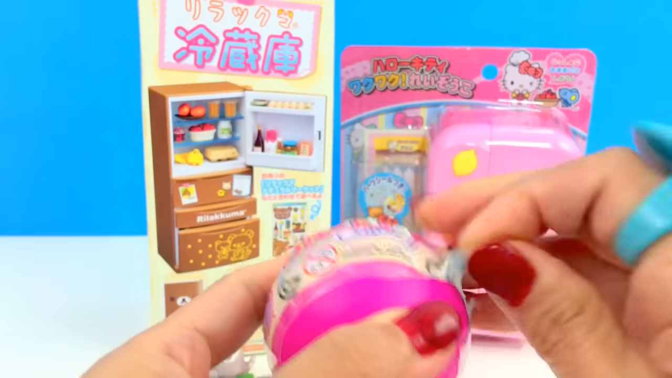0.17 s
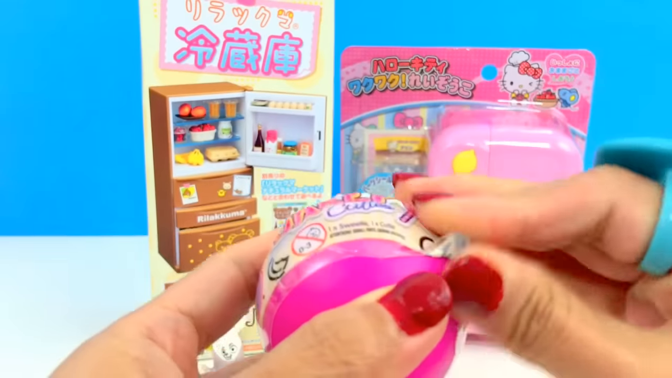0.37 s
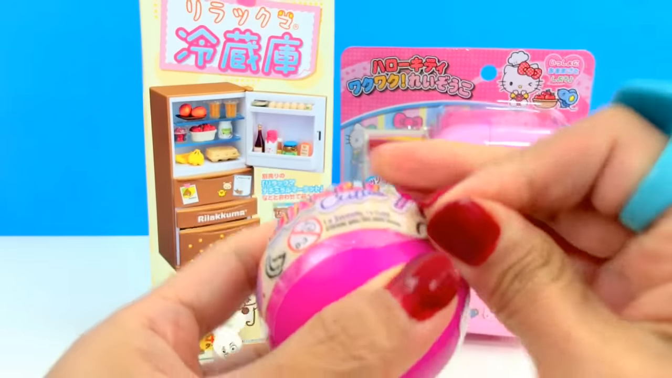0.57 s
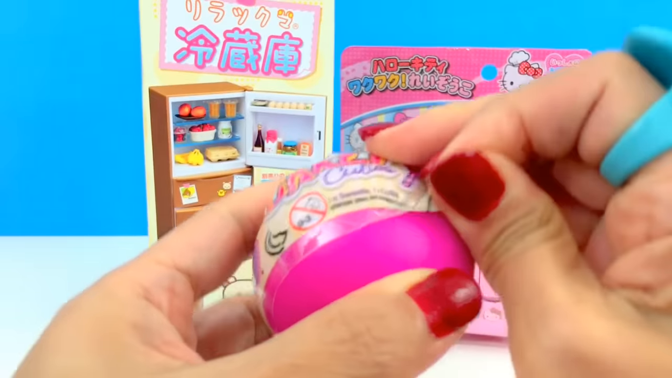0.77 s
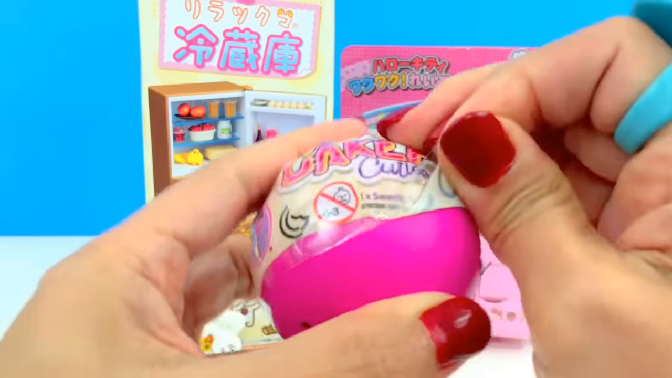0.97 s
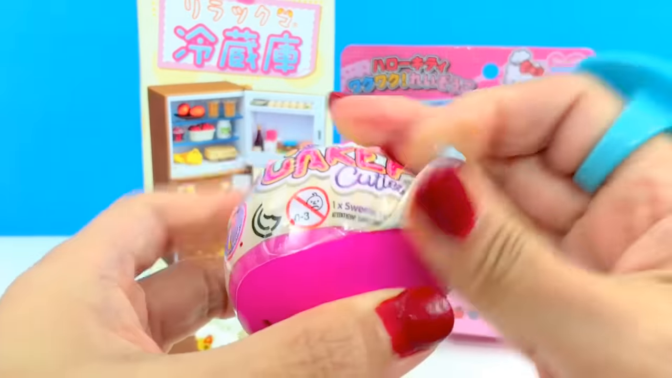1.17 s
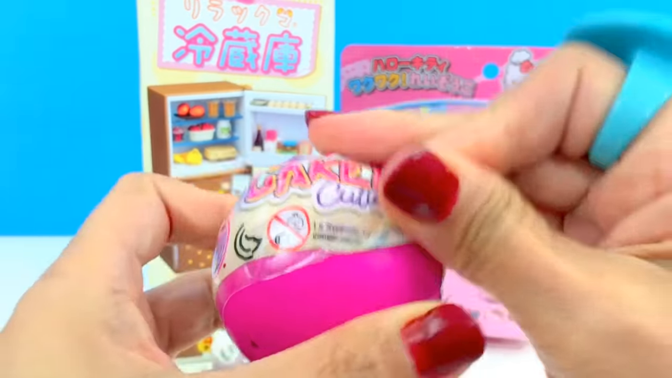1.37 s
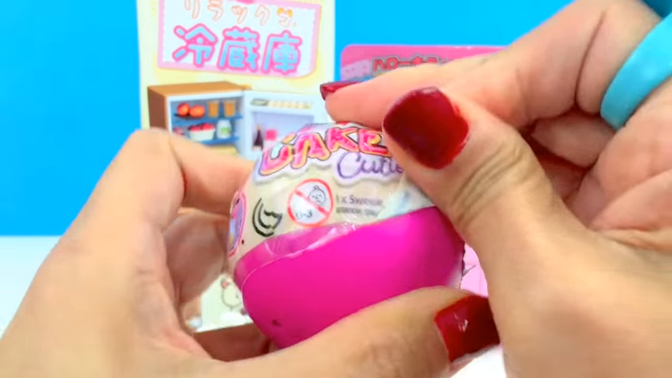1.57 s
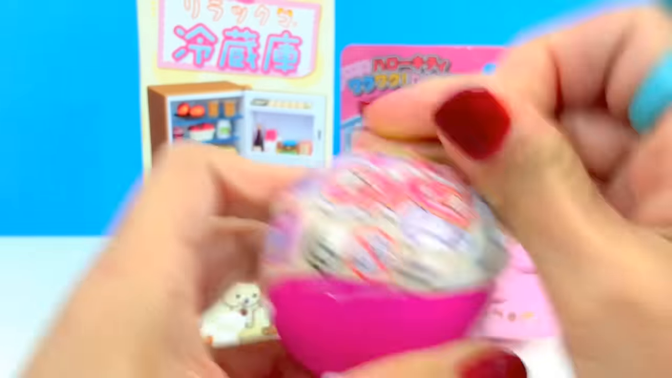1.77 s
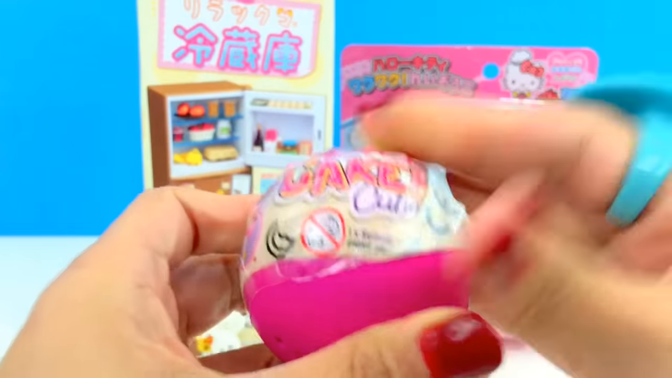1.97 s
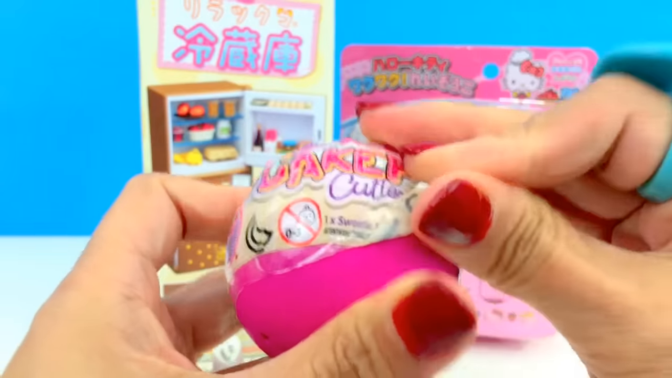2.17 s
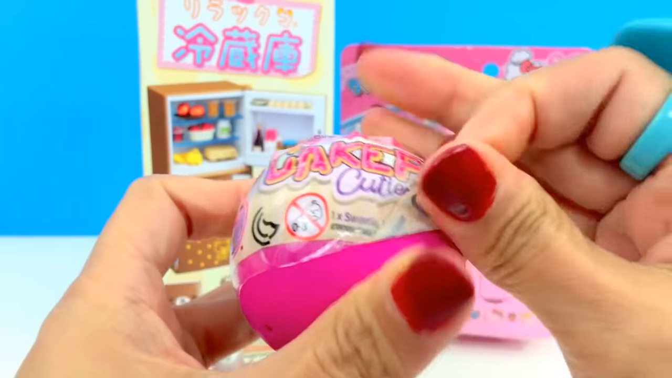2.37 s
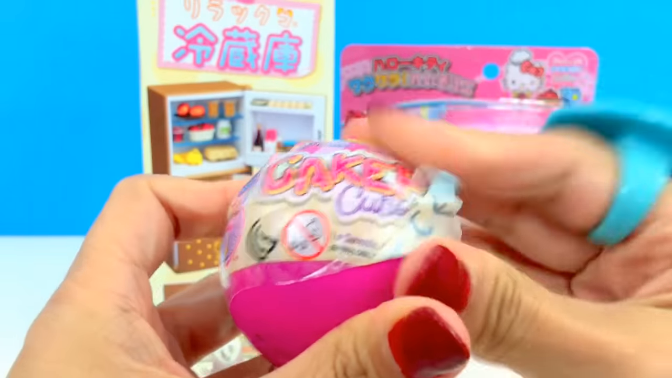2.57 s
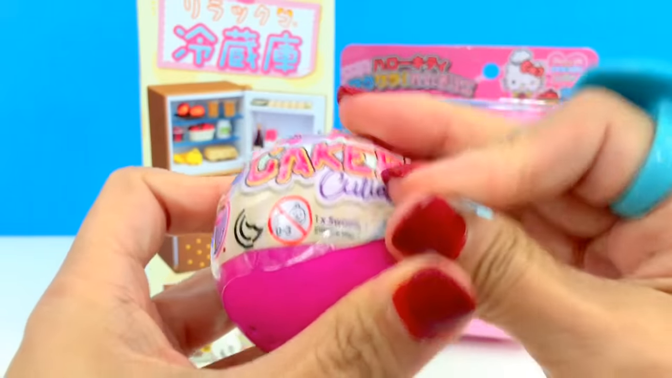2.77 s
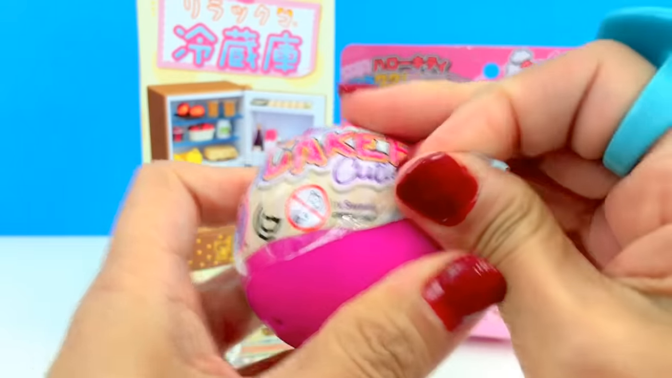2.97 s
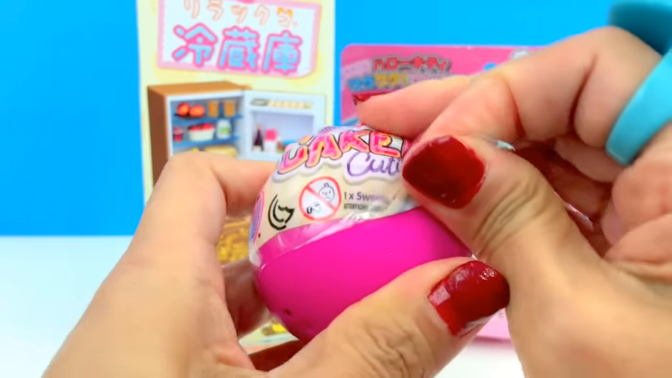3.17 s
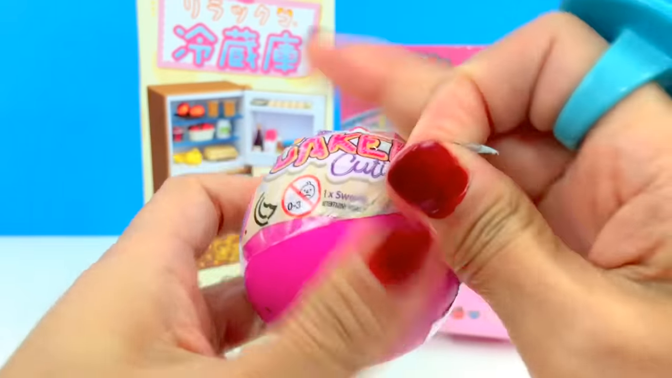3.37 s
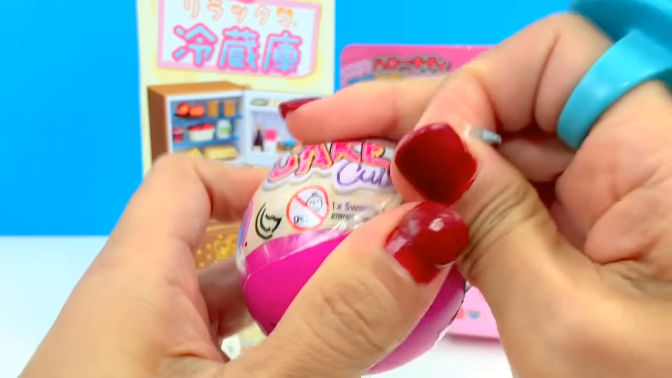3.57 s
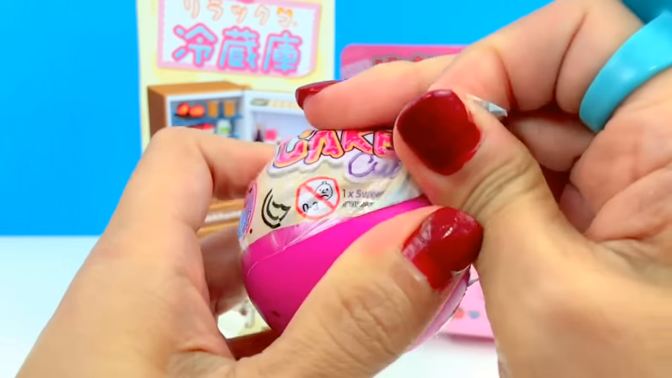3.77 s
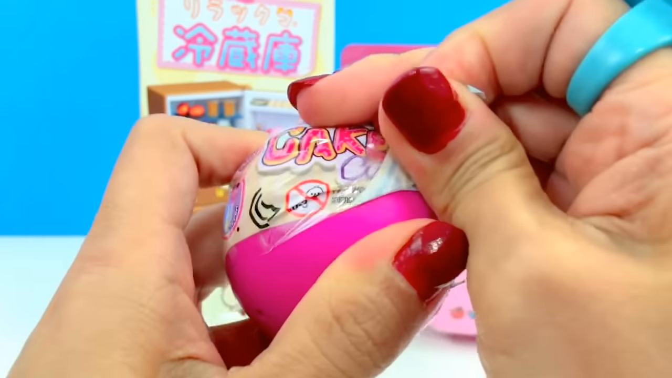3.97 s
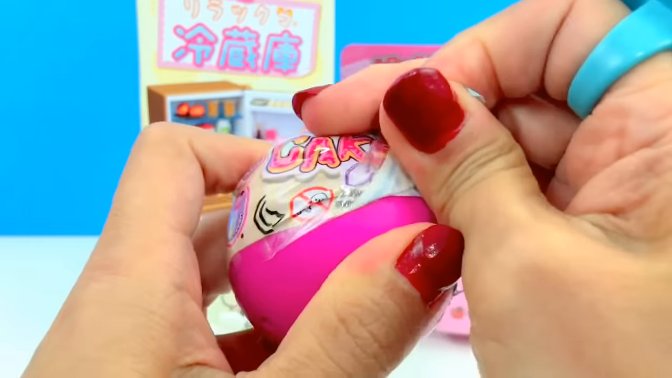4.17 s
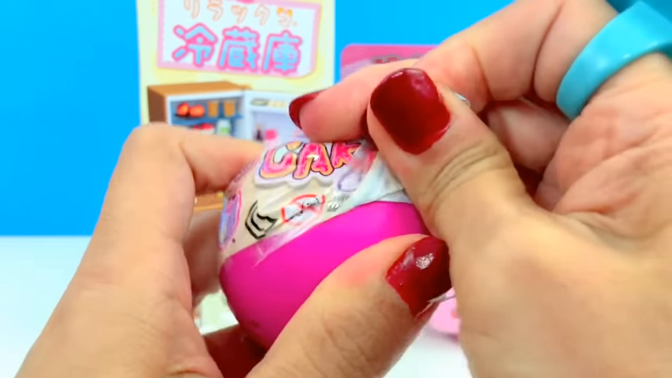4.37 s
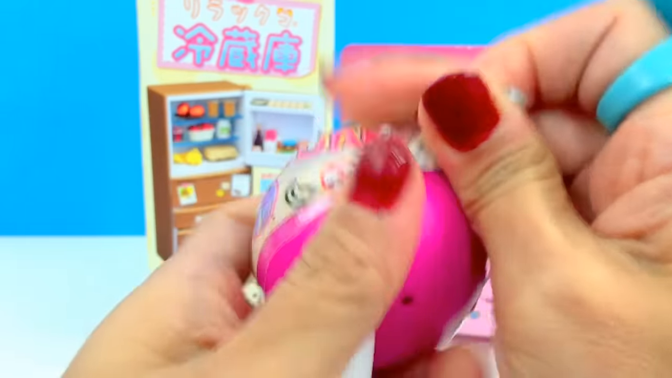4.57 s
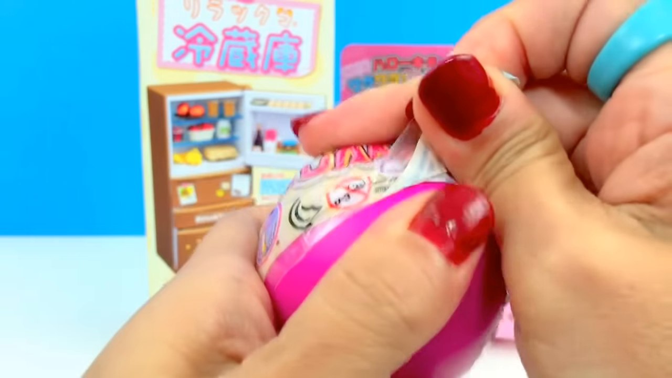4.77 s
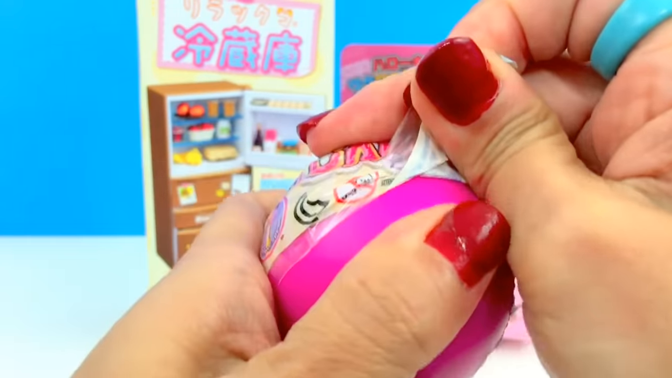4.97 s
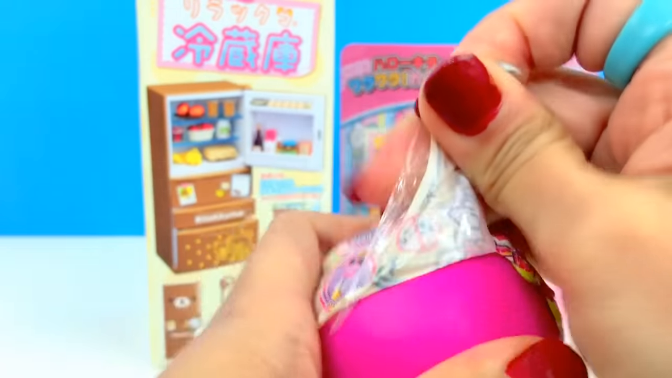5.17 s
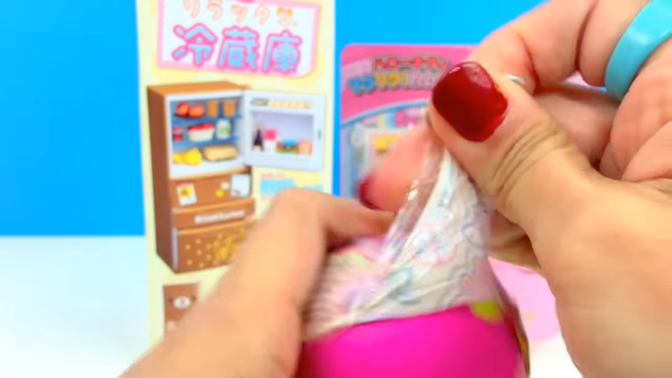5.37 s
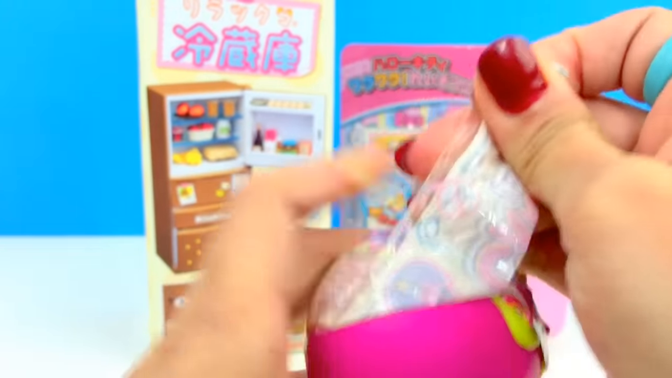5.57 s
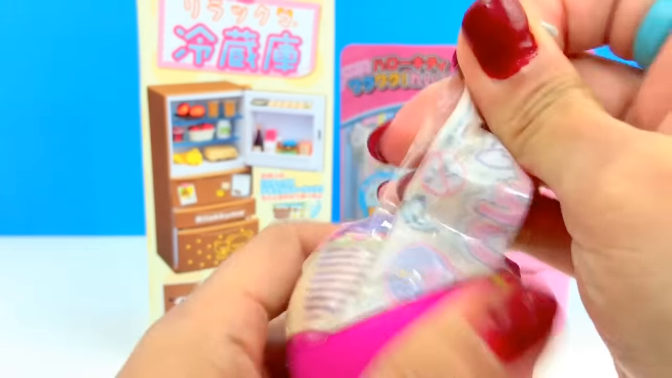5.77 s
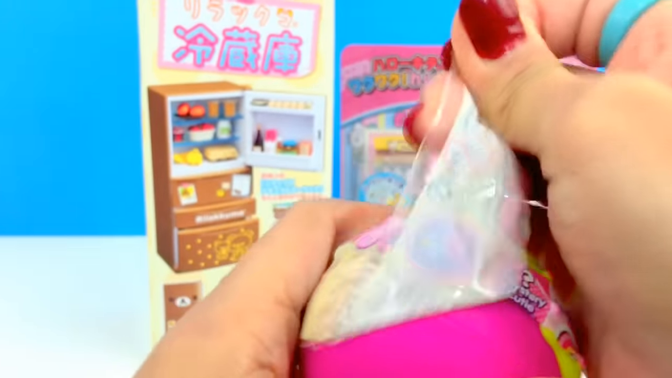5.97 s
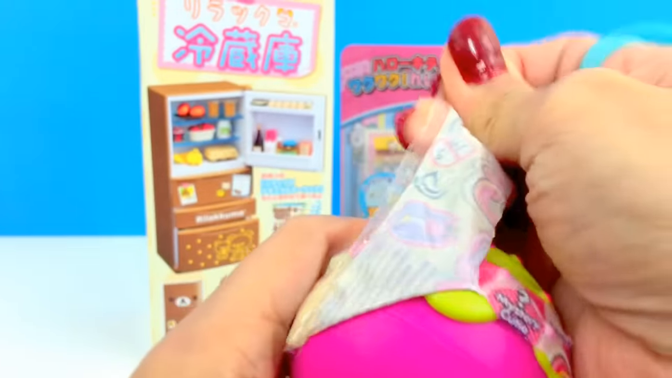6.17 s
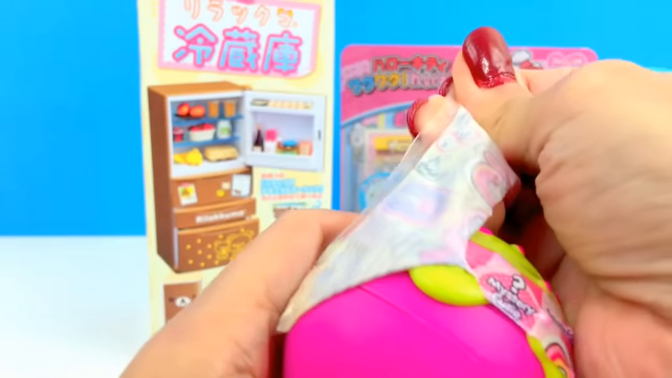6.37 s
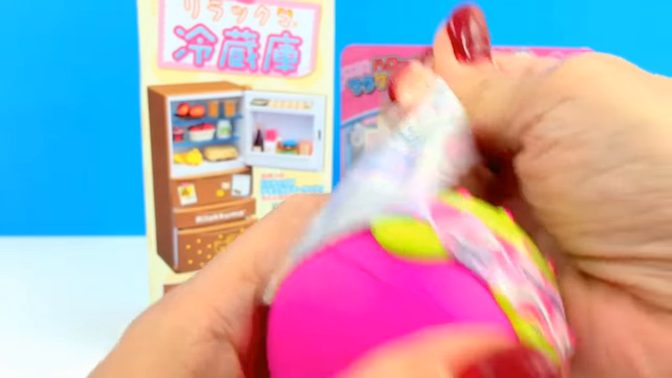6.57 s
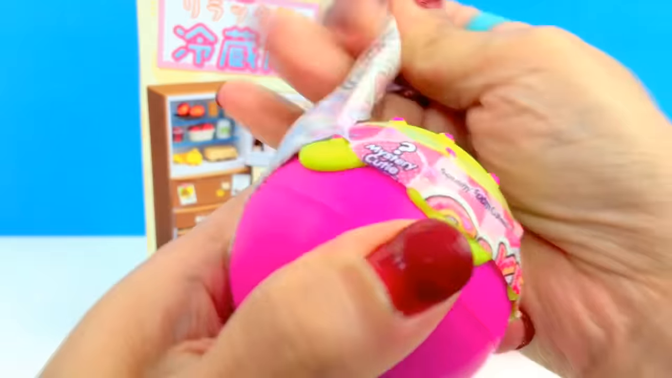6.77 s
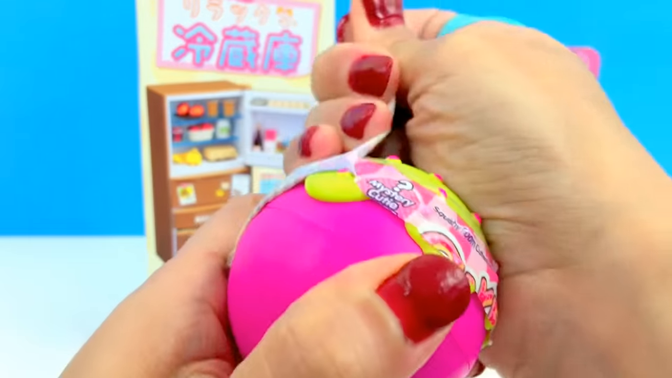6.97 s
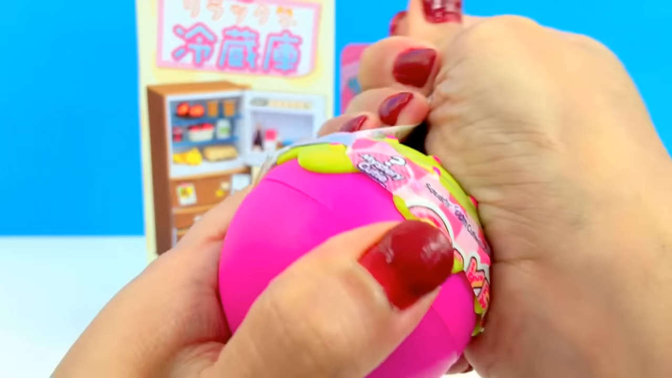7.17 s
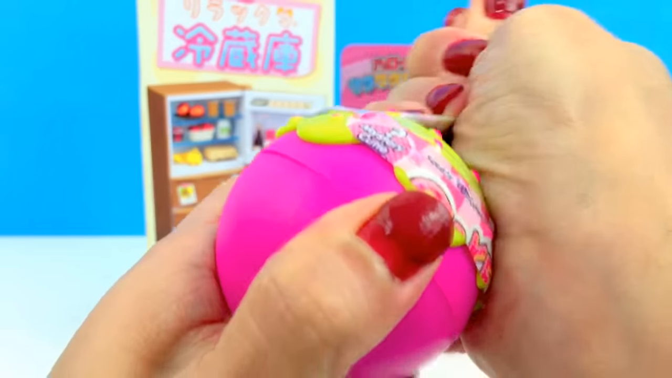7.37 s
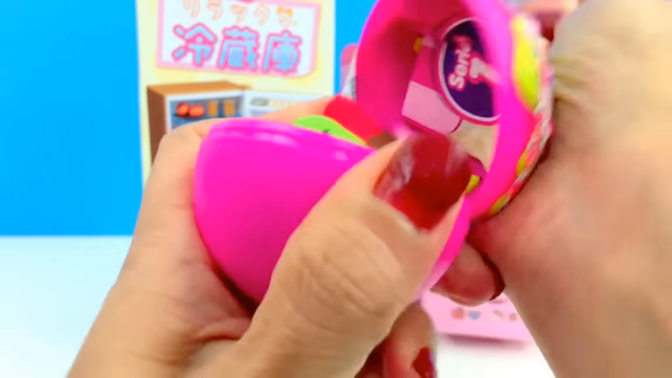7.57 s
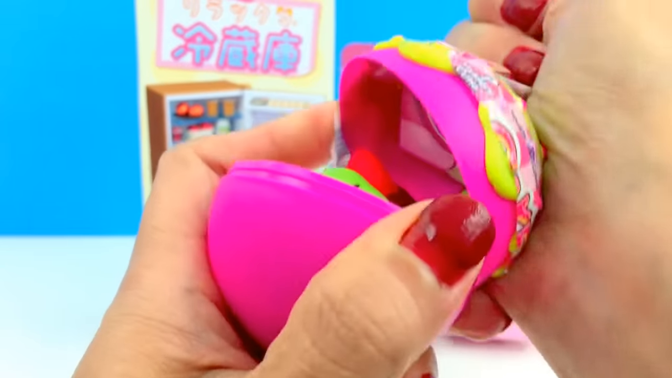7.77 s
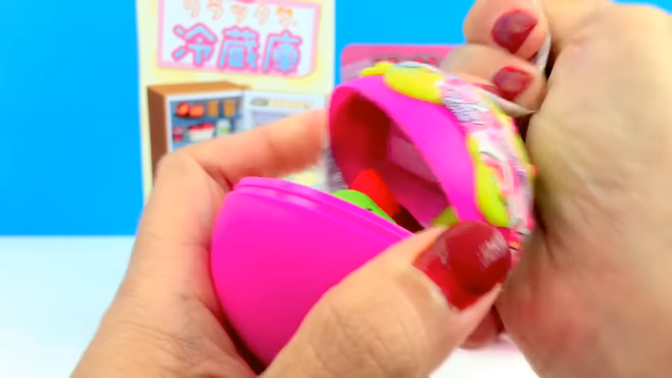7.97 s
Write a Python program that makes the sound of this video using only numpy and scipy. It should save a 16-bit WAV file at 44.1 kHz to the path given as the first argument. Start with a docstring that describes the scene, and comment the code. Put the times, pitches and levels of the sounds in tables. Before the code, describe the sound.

Sparse crinkles and isolated bright snaps of plastic wrap start quietly, with one taut crackling flurry early on. After a lull the film gives way in hard, dense crackles and short low puffs, then a perforated strip rips tab by tab. Brief creaks and hollow plastic knocks lead to the capsule popping open, then fade to small ticks. Close, dry, slightly overloaded, with a short small-room tail and faint hiss.

```python
"""Fingers peel thin plastic film off a hollow toy capsule close to a microphone in a small quiet room.
Creases snap as short bright noise bursts with body, fizz and a ring; a perforated seam rips tab by tab
in clicks with fast falling chirps; sudden releases give short low thumps, heard as falling chirps, that
overload the input. Slips creak in quick runs of knocks and ticks, filtered noise grains rustle under
finger strokes, and a diffuse room tail, hiss and a low hum lie below."""
import sys
import numpy as np
from scipy import signal
from scipy.fft import rfft, irfft, next_fast_len
from scipy.io import wavfile
from scipy.ndimage import uniform_filter1d

SR = 44100
rng = np.random.default_rng(int(sys.argv[2]) if len(sys.argv) > 2 else 0)


def log_audio(samples):
    """Write samples as a 16-bit WAV file to the path given in sys.argv[1]."""
    # one column per channel
    frames = np.atleast_2d(samples).T
    # limit to full scale, then quantise
    limited = np.clip(frames, -1, 1)
    pcm = np.round(limited * 32767).astype(np.int16)
    wavfile.write(sys.argv[1], SR, pcm)


N = 352932

# broad modes of the hollow capsule and film: (frequency [Hz], width [Hz], level [dB])
SHELL_MODES = [(1077, 45, -17.5), (2153, 380, -4), (3280, 500, -1), (4340, 480, -4.5), (6140, 2000, -2.5),
               (8720, 1500, -9.5)]


def undb(db):
    """Decibels to amplitude gain."""
    return 10 ** (np.asarray(db) / 20)


def unit(x):
    """Scale to rms 1."""
    return x / np.sqrt(np.mean(x ** 2))


def peak_one(rows):
    """Scale every row to peak 1."""
    return rows / (np.abs(rows).max(axis=1, keepdims=True) + 1e-12)


def band(x, lo_hz, hi_hz, order=2):
    """Butterworth band-pass along the last axis."""
    return signal.sosfilt(signal.butter(order, [lo_hz, hi_hz], "band", fs=SR, output="sos"), x)


def place(times, sounds):
    """Lay each row of sounds on the time line."""
    out = np.zeros(N + sounds.shape[1])
    for s, sound in zip(times, sounds):
        i = min(int(s * SR), N)
        out[i:i + len(sound)] += sound
    return out[:N]


def walk(rate):
    """Random levels held 1 / rate s, then smoothed twice over that span."""
    k = int(SR / rate)
    held = np.repeat(rng.standard_normal(N // k + 1), k)
    return uniform_filter1d(uniform_filter1d(held, k), k)[:N]


def air():
    """Room tone and hiss, drifting slightly in level, with a low hum wavering as narrow-band noise."""
    # noise spectrum, scaled as a whole afterwards: (frequency [Hz], relative density [dB])
    spectrum = [(20, -31), (60, 3), (110, -5.5), (320, -11), (600, -17), (2000, -18.5), (4400, -21.5),
                (5200, -27), (10000, -31.5), (16500, -36.5)]
    hz, db = np.transpose(spectrum)
    size = next_fast_len(N)
    f = np.maximum(np.arange(size // 2 + 1) * SR / size, 1)
    colour = undb(np.interp(np.log(f), np.log(hz), db))
    hiss = unit(irfft(rfft(rng.standard_normal(size)) * colour, size)[:N])
    hum = unit(band(rng.standard_normal(N), 58.7, 64))
    return undb(-55.5) * (undb(walk(3.1)) * hiss + undb(-12.5) * hum)


def room(x, room_db=-17.5):
    """Walls return a diffuse tail whose top treble dies first."""
    t = np.arange(SR // 2) / SR
    tail = 0
    # (low edge [Hz], high edge [Hz], T60 [s], level [dB])
    for lo_hz, hi_hz, t60, db in [(507, 2100, 0.182, 0.0), (2420, 11000, 0.268, -5.5), (8000, 21000, 0.042, 4.5)]:
        decay = np.exp(-np.log(1000) * t / t60)
        tail = tail + undb(db) * band(rng.standard_normal(len(t)), lo_hz, hi_hz) * decay
    tail = tail * np.clip(t / 0.00097, 0, 1)
    return undb(room_db) * signal.fftconvolve(x, tail / np.sqrt(np.sum(tail ** 2)))[:N]


def shell(x, direct_db=-8):
    """The hollow capsule and film ring at broad modes beside the direct sound."""
    out = undb(direct_db) * x
    for hz, width_hz, db in SHELL_MODES:
        out = out + undb(db) * signal.lfilter(*signal.iirpeak(hz, hz / width_hz, fs=SR), x)
    return out


def strokes(t):
    """Rustle level and treble tilt in dB at times t; overlapping strokes add in power."""
    # finger strokes: (time of peak [s], level [dB], rise [s], fall [s], treble tilt [dB])
    stroke_table = [(.258, -45.5, .05, .04, -11), (0.319, -50, .03, 0.12, 2),
                    (.485, -56.5, 0.08, 0.031, 10.5), (.9, -62, 0.5, 0.25, -24),
                    (1.23, -55.5, 0.17, 0.11, -1), (1.335, -47, 0.054, 0.051, -0.5),
                    (1.713, -40.5, .02, 0.073, 4), (1.81, -34.5, .05, .07, -2), (1.86, -37, .04, .045, 1.5),
                    (1.96, -53.5, .15, .3, -3), (2.13, -45.5, 0.04, 0.12, 3), (2.47, -53, 0.39, 0.24, -3.5),
                    (2.64, -50, 0.13, 0.37, -4.5), (3.129, -56.5, 0.67, 0.039, -8.5),
                    (3.391, -53.5, 0.038, 0.042, 4.5), (3.469, -53.5, 0.03, 0.03, 2),
                    (3.58, -56.5, 0.094, 1.78, -5), (4.58, -54.5, 0.3, 0.5, -0.5),
                    (5.13, -44.5, 0.054, .15, 1.5), (5.36, -50, 0.063, 0.41, -5),
                    (5.48, -42.5, .04, .1, -6), (5.95, -50, 0.39, 1.4, -1), (6.041, -32, .015, .03, -6),
                    (6.33, -40, .06, .2, 0), (6.7, -42.5, 0.03, 0.23, -4), (6.97, -41.5, .25, 0.29, -3),
                    (7.2, -43, 0.32, 0.15, -1), (7.396, -42.5, 0.033, .05, 13.5),
                    (7.52, -40, 0.08, 0.16, -8), (7.728, -46, .025, 0.05, -3), (8, -57, 1, .5, -9)]
    span_db = 20  # level change over one rise or fall time
    power, tilt = 1e-12, 0
    for s, db, rise, fall, tilt_db in stroke_table:
        distance = np.where(t < s, (s - t) / rise, (t - s) / fall)
        p = undb(db - span_db * distance) ** 2
        power, tilt = power + p, tilt + p * tilt_db
    return 10 * np.log10(power), tilt / power


def rustle(grains_per_s=500, scatter_db=3.5):
    """Countless tiny creases, a few louder than the rest, sound through the shell under finger strokes."""
    t = np.arange(N) / SR
    db, tilt_db = strokes(t)
    hits = (rng.random(N) < grains_per_s / SR) * undb(scatter_db * rng.exponential(size=N))
    # each crease lets out noise that dies in a few milliseconds, over a steady noise bed
    envelope = signal.lfilter([1], [1, -np.exp(-1 / (0.0027 * SR))], hits) + .4
    grains = shell(envelope * rng.standard_normal(N))
    dull = unit(band(grains, 2410, 9800))
    bright = unit(band(grains, 7350, 17700))
    hollow = unit(band(grains, 1420, 2100))
    taut = unit(band(grains, 3170, 3450))
    # as the film comes off, the bare shell sounds through more
    hollow_db = np.interp(t, [5, 7.5], [-9, -4])
    # the film rings while it is pulled tight
    taut_db = np.interp(t, [1.6, 1.82, 2.1], [-24, -5, -24])
    mix = dull + undb(tilt_db) * bright + undb(hollow_db) * hollow + undb(taut_db) * taut
    return undb(db + 3.3 * walk(30)) * mix


def snaps(count, t60_ms, spread=.3):
    """Noise bursts of a sharp spike and a ragged decay, each with its own length around t60_ms."""
    t = np.arange(900) / SR
    draw = rng.standard_normal((count, len(t) + 1))
    t60 = t60_ms / 1000 * np.exp(spread * draw[:, :1])
    spike = 1 + 1.5 * np.exp(-t / .0003)
    attack = np.minimum(t / .0001, 1)
    return draw[:, 1:] * spike * np.exp(-np.log(1000) * t / t60) * attack


def creaks():
    """Film and shell creak in quick runs of slips: dull knocks with ticks, the middle run a zip of bright ticks."""
    # (start [s], end [s], slip rate [1/s], level [dB], bright tick re knock [dB])
    creak_table = [(6.983, 7.037, 170, -38, 4), (7.06, 7.165, 170, -53, 26), (7.882, 7.99, 70.5, -40, 1)]
    out = 0
    for start, end, rate, db, tick_db in creak_table:
        s = start + np.arange(round((end - start) * rate)) / rate
        draw = rng.standard_normal((len(s), 2))
        knock = peak_one(band(snaps(len(s), 16), 1438, 2100))
        tick = peak_one(band(shell(snaps(len(s), 3.1)), 2440, 16000))
        slip_db = db + 2 * draw[:, 1:]
        out = out + place(s + 0.00048 * draw[:, 0], undb(slip_db) * (knock + undb(tick_db) * tick))
    return out


def thump(length_ms, growth=1.95, first_ms=1.2):
    """A low thump as a falling chirp: each half swing lasts longer by a constant factor."""
    ms = (1 + np.arange(4000)) * 1000 / SR
    u = ms / np.reshape(length_ms, (-1, 1))
    swell = 2 * u / (1 + u ** 2.6) * np.exp(-(ms / 40) ** 2)
    return swell * np.sin(np.pi * np.log(ms / first_ms) / np.log(growth))


def puffs():
    """Sudden releases of the film and the shell popping open puff air on the microphone as low thumps."""
    # (time [s], level [dB], length [ms], direction [push 1 or pull -1])
    puff_table = [(5.1367, 0.5, 4.8, 1), (5.4845, -11, 2.4, -1), (6.4786, -9, 3, -1), (7.3974, 4, 6.2, -1),
                  (1.7135, -30, 7, -1), (6.9734, -24, 2.7, -1), (7.3885, -12, 6, -1), (7.374, -28, 6, 1),
                  (5.124, -18, 4, 1), (3.755, -28, 3, -1)]
    s, db, length_ms, way = np.transpose(puff_table)
    thumps = place(s, (np.sign(way) * undb(db))[:, None] * thump(length_ms))
    # the microphone's vent lets the slowest pressure leak away
    return signal.sosfilt(signal.butter(2, 30., "high", fs=SR, output="sos"), thumps)


def seam():
    """Every tab breaks with one sharp click that trails off in a fast falling chirp, and the film rattles."""
    # course of the rip along the perforated seam: (time [s], tab level [dB])
    rip = [(6.2964, -12), (6.3124, -10.5), (6.3569, -24), (6.409, -18), (6.4255, -12.5), (6.4312, -10),
           (6.46, -6), (6.495, -8), (6.5779, -3.5)]
    # tabs torn by each of those times: (count)
    torn = [0, 2, 8, 15, 18, 19, 22, 23, 24]
    jitter_s, scatter_db = .0004, 1
    when, tab_db = np.transpose(rip)
    tab = np.arange(torn[-1] + 1)
    draw = rng.standard_normal((len(tab), 2))
    s = np.interp(tab, torn, when) + jitter_s * draw[:, 0]
    db = np.interp(tab, torn, tab_db) + scatter_db * draw[:, 1]
    ms = (1 + np.arange(900)) * 1000 / SR
    chirp = np.sin(np.pi * np.log(ms / 0.057) / np.log(2.4))
    click = chirp * (ms / 0.11) ** -.75 * np.exp(-ms / 5)
    # the tabs are alike, so their bright fronts nearly repeat
    fronts = snaps(1, 2.6, spread=0) + .5 * snaps(len(s), 4.2)
    fizz = peak_one(band(fronts, 11400, 17000))
    rattle = peak_one(band(shell(snaps(len(s), 9, spread=0.21)), 3800, 8000, order=1))
    # the loose flap grows along the seam: less tight film to fizz
    fizz_db = np.interp(s, [6.3, 6.42, 6.46], [-1.5, -3, -10])[:, None]
    tabs = undb(fizz_db) * (fizz + undb(-4.0) * rattle) - undb(-1.5) * click
    return place(s, undb(db)[:, None] * tabs)


def ticks():
    """Small random creases as crack rows, denser and stronger in busy strokes, each ringing near a shell mode."""
    count, crowding = 900, .45  # crowding: share of the stroke level in dB that sets the density
    over_rustle_db, scatter_db, colour_db = 2, 2.5, 7
    chance, colour = rng.random((count, 3)), rng.standard_normal((count, 3))
    t = np.arange(0, N / SR, 1 / 1000)
    busy = np.cumsum(undb(crowding * strokes(t)[0]))
    s = np.interp(chance[:, 0], busy / busy[-1], t)
    db, tilt_db = strokes(s)
    db = db + over_rustle_db - scatter_db * np.log(1 - chance[:, 1])
    body_db = -6.5 + colour_db * colour[:, 0]
    fizz_db = tilt_db + 4 + colour_db * colour[:, 1]
    # any mode but the lowest and the highest
    mode = 1 + (chance[:, 2] * (len(SHELL_MODES) - 2)).astype(int)
    ring_hz = np.array(SHELL_MODES)[mode, 0] * (1 + 0.076 * colour[:, 2])
    return np.column_stack([s, db, body_db, fizz_db, ring_hz])


def cracks(ring_db=-3, ring_q=12.0):
    """Each crack has body, middle and fizz, and the buckling patch of film rings briefly at its own pitch."""
    # louder creases and shell snaps, body and fizz relative to the crack's level:
    # (time [s], level [dB], body [dB], fizz [dB], ring [Hz])
    crack_table = [(0.127, -30.5, -6, 9, 4700), (0.209, -31.5, -30, -1, 4620), (0.2554, -24, -16, -7, 3210),
                   (0.263, -22.5, -10, -8, 1980), (0.3096, -24.5, -12, -15, 5920),
                   (0.3193, -28, -8.5, -8, 1615), (0.665, -40.5, 4, -10, 695),
                   (0.8727, -19.5, -21, 1, 6900), (0.9027, -18.5, -14, -5, 3180),
                   (0.92, -23, -4.5, -10, 3500), (0.9702, -24.5, -9.5, -3, 5500),
                   (1.0921, -20.5, -36.5, 0, 4340), (1.2614, -23, -6, -24, 3780),
                   (1.6428, -16.5, -13, 4.5, 6250), (1.7143, -0.5, -9, -2, 6450),
                   (1.777, -32, 8, -10, 1430), (1.7903, -20.5, 0, -1, 3300), (1.7995, -28, 3, -9.5, 3235),
                   (1.8077, -19, -1.5, -12, 3300), (1.8164, -18, -19, -1, 3030),
                   (1.8466, -11.5, -24, -6, 4500), (1.8573, -17, -30, -17, 3440),
                   (1.9412, -26, 5.5, -8, 1410), (1.994, -33, 0, 8.5, 7600), (2.131, -25, -22, 15.5, 7080),
                   (2.108, -38, -8, 14.5, 4460), (2.145, -6, -14, 1.5, 7050), (2.157, -27.5, 2, 0, 2200),
                   (2.393, -26, -15.5, 2, 5800), (2.4332, -19.5, -36.5, -6, 4500),
                   (2.4687, -24.5, -19, 7.5, 3170), (2.49, -29, -13, -1, 3200),
                   (2.7044, -11, -9.5, 10.5, 6250), (3.5795, -28.5, -26, 3, 6000),
                   (3.656, -21, -8, 8.5, 5900), (3.7113, -34, -27, 19.5, 6070),
                   (3.7555, -8, -12.5, 13, 3800), (3.769, -18.5, -30, 13, 7400),
                   (3.8633, -24.5, -13, 10.5, 7630), (4.318, -35.5, 2, -2, 725),
                   (4.393, -29, -10, 7.5, 3370), (4.474, -34, 9, -35, 2200),
                   (4.494, -26.5, -6.5, -20, 3200), (4.5362, -30, -11, -6, 6270),
                   (4.5822, -15.5, -24, -2, 3623), (4.7709, -35.5, 13.5, -3, 727),
                   (4.8818, -20, -17.5, -0.5, 4570), (5.1248, -24, 4, -0.5, 6160),
                   (5.1303, -6.5, -14, -9, 6600), (5.135, -4, 3.5, 8.5, 6170), (5.1514, -12, -4, -3, 3960),
                   (5.161, -7.5, -16, -10, 6600), (5.184, -15, -29, -11, 5240), (5.2, -11.5, -17, 4, 6260),
                   (5.3314, -14, -29, -26, 4060), (5.3977, -30.5, -4, 3, 5730),
                   (5.4647, -17.5, -4.5, -7, 3290), (5.4781, -3, -9.5, -21, 5500), (5.4851, 4, -3, 5, 5550),
                   (5.4933, -18, 7.5, 21, 5740), (5.499, 2.5, -7, 1.5, 6400),
                   (5.6155, -17.5, -3.5, -30, 2350), (5.7701, -15, -10.5, 2, 3700),
                   (5.7986, -26, 0, -8, 1647), (5.8455, -20, -8.5, 2, 6500), (5.9041, -25, -1.5, 5.5, 4200),
                   (5.9828, -19.5, -6, 2.5, 6370), (6.0336, -3.5, -5.5, 4, 4680),
                   (6.0417, -6.5, -5, 6.5, 6750), (6.0481, -6.5, -7.5, -19, 6100),
                   (6.052, -17, -2, -10, 2030), (6.0759, 3, -20, 3.5, 6400), (6.0866, -3, -0.5, 8.5, 2100),
                   (6.0876, -9, 4.5, 14, 1010), (6.2015, -14.5, -8, 1.5, 3320), (6.2278, -22, -9, 3, 4280),
                   (6.236, -7, -23, 3.5, 7100), (6.2815, -19.5, 0.5, -13, 5960),
                   (6.2853, -3.5, -18, 3.5, 6100), (6.4746, -28, 9.5, -23, 935),
                   (6.4791, -7.5, 3.5, 2.5, 5680), (6.685, -24, -13, 0, 4340),
                   (6.7093, -6.5, -17, -18, 6860), (6.727, -15.5, 10, -6, 2100),
                   (6.766, -30, -18, -4, 5500), (6.7736, -14.5, -11, 4, 6850), (6.784, -18, -13, -16, 6710),
                   (6.814, -28, -20, 1, 5500), (6.8386, -18.5, -31, -6, 4200), (6.872, -25, 4, -10, 675),
                   (6.875, -6, -10, -5.5, 4180), (6.8916, -4, -12, 2, 4380), (6.904, -23, 6, -14, 2420),
                   (6.9158, -1.5, -5, -7.5, 2000), (6.9382, -30, -20, -7, 4230),
                   (6.955, -22, -27, -15, 4180), (6.9608, -2.5, -23, -4.5, 6170),
                   (6.9739, -8.5, 0, 1.5, 6500), (7.0482, -18.5, -11.5, -7, 4280),
                   (7.0636, -18, -19, -8, 4280), (7.072, -23, -8, 9, 7450), (7.1692, -5, -11, 4.5, 6100),
                   (7.1861, -5, -7, 1, 1940), (7.2478, -14, -15, -28, 3325), (7.3981, -4, -0.5, -6, 3000),
                   (7.4251, -4.5, -36.5, -0.5, 5600), (7.4787, -30, -14, 12.5, 6990),
                   (7.4831, -5, 3, -13, 920), (7.4912, -4, -2, 1, 5440), (7.501, -17, 0, 6, 4790),
                   (7.512, -4, -22, 5, 5500), (7.5162, -14, -5, -7, 5450), (7.53, -24.5, 2, -10, 2020),
                   (7.59, -30.5, 6, -13, 2000), (7.6049, -23, -1, 2, 2000), (7.618, -33.5, 9.5, -3, 1900),
                   (7.6237, -22.5, 8.5, 0, 1940), (7.6442, -35.5, 4, 13, 2130),
                   (7.664, -37.5, 13, -10, 1250), (7.745, -36.5, -20, 6, 6500),
                   (7.7718, -37.5, 7, -10, 1860), (7.8567, -19.5, -4.5, 2.5, 1764),
                   (7.9886, -39.5, 3, 19, 6760), (7.996, -35.5, 2.5, 15, 2100)]
    s, db, body_db, fizz_db, ring_hz = np.vstack([crack_table, ticks()]).T[:, :, None]
    middle = peak_one(band(shell(snaps(len(s), 11)), 2500, 7000))
    body = undb(body_db) * peak_one(band(shell(snaps(len(s), 13.3)), 510, 1990))
    fizz = undb(fizz_db) * peak_one(band(shell(snaps(len(s), 9.3)), 7650, 19140))
    rings = []
    for hz, kick in zip(ring_hz[:, 0], snaps(len(s), 6)):
        rings.append(signal.lfilter(*signal.iirpeak(hz, min(ring_q, hz / 170), fs=SR), kick))
    # a low ring follows the body's level and takes over part of its strength
    low = ring_hz < 2500
    ring = peak_one(np.array(rings)) * undb(ring_db + np.where(low, body_db + 0.5, 0))
    body = body * undb(np.where(low, -3, 0))
    return place(s[:, 0], undb(db) * (undb(-2) * middle + undb(-1.0) * body + fizz + ring))


def scene():
    """All sources at the microphone; the room answers the film but not the puffs."""
    film = cracks() + seam() + creaks() + rustle()
    return (film + room(film) + puffs() + air())[None, :]


def record(dry, top_hz=16100):
    """The input clips at full scale, then a steep low-pass cuts the top."""
    return signal.sosfilt(signal.ellip(8, .2, 60, top_hz, fs=SR, output="sos"), np.clip(dry, -1, 1))


dry = scene()
out = record(dry)
log_audio(out)
```